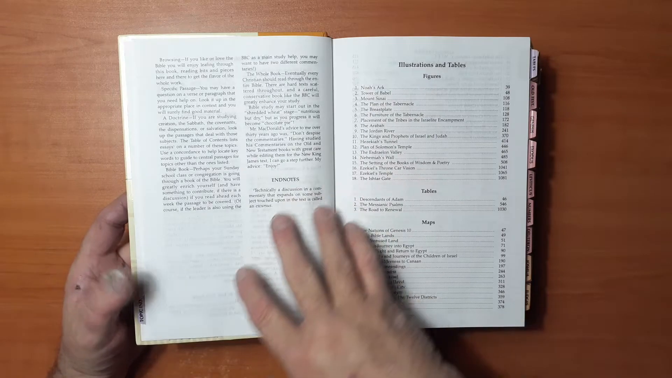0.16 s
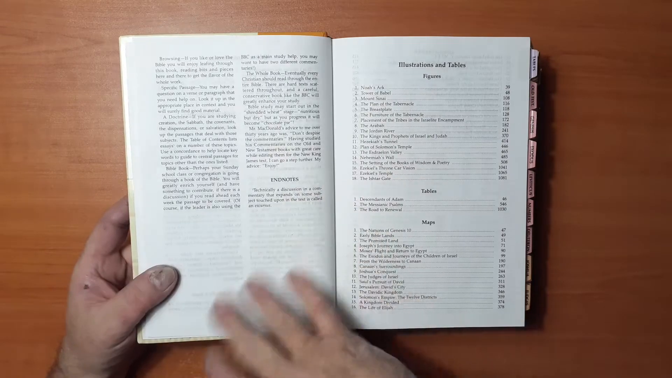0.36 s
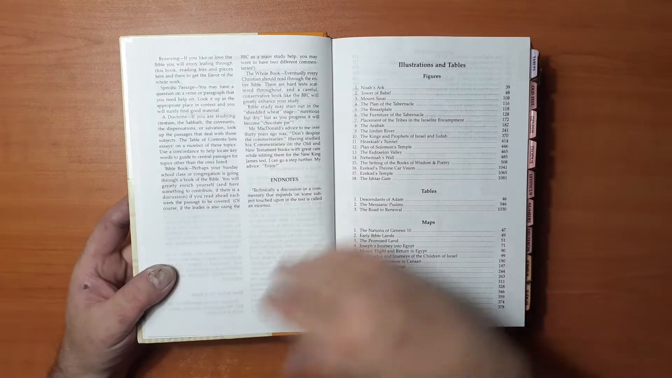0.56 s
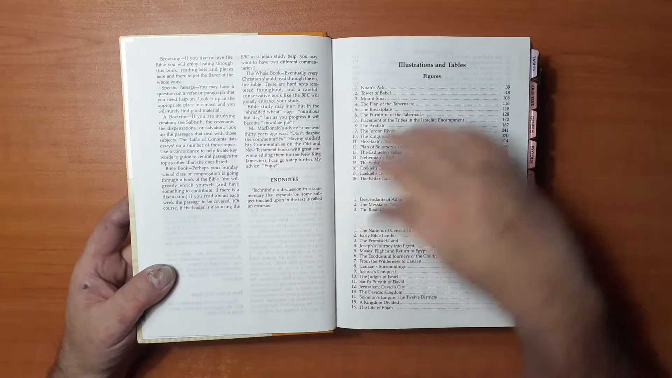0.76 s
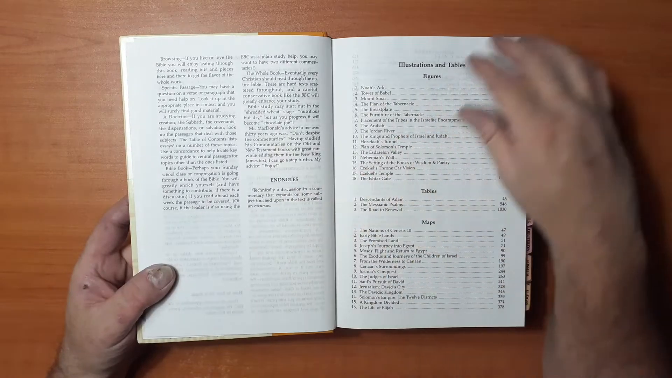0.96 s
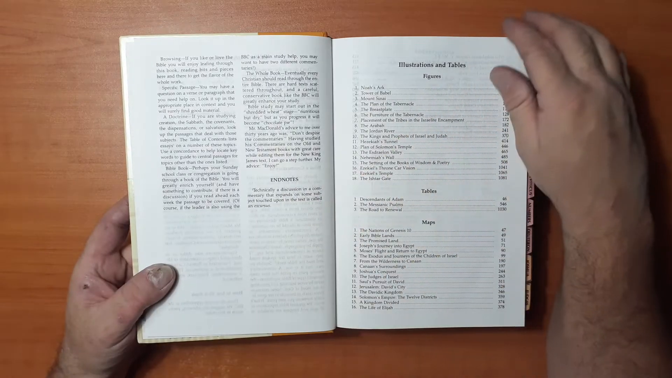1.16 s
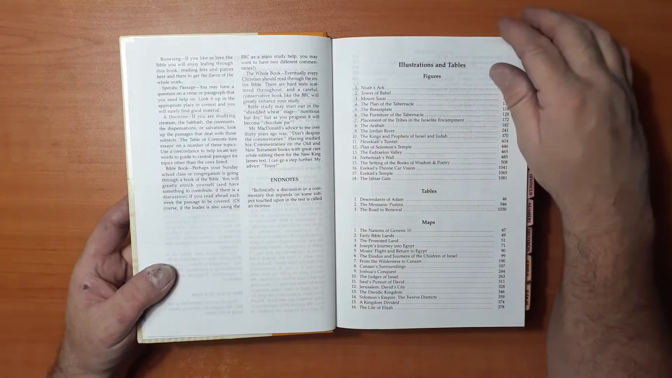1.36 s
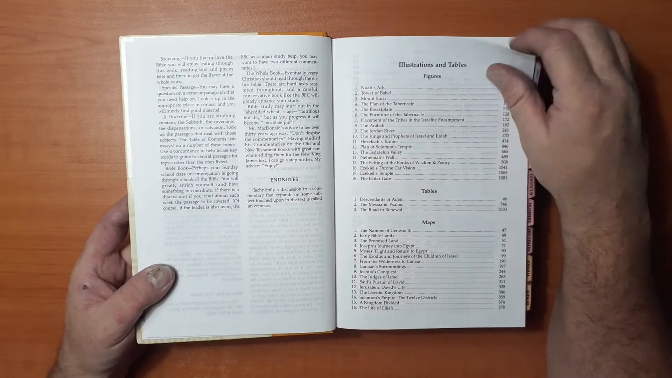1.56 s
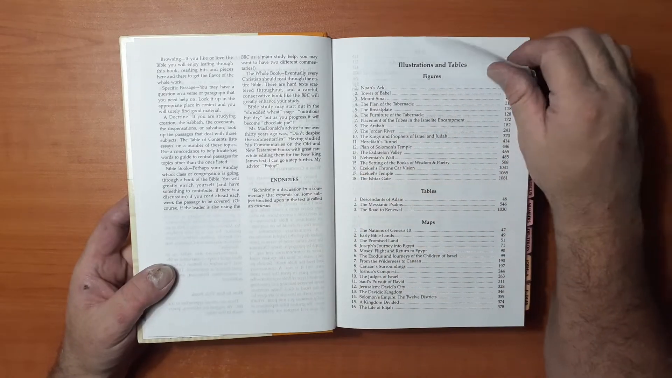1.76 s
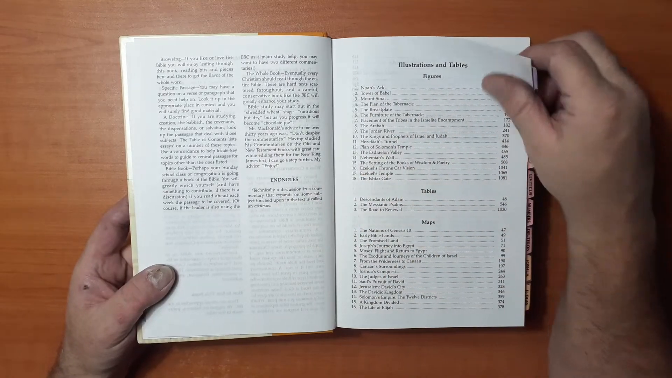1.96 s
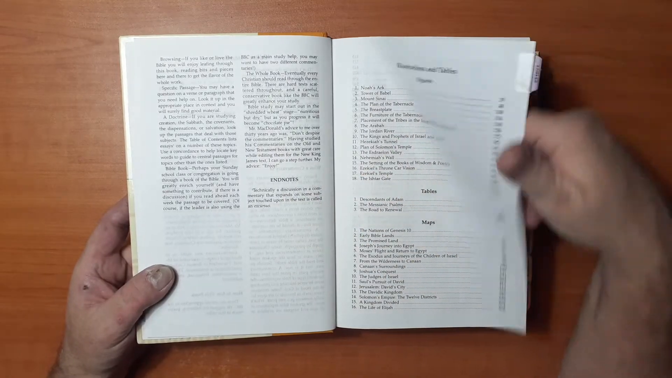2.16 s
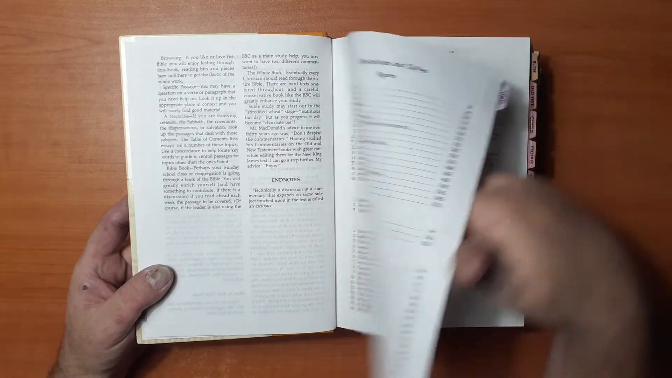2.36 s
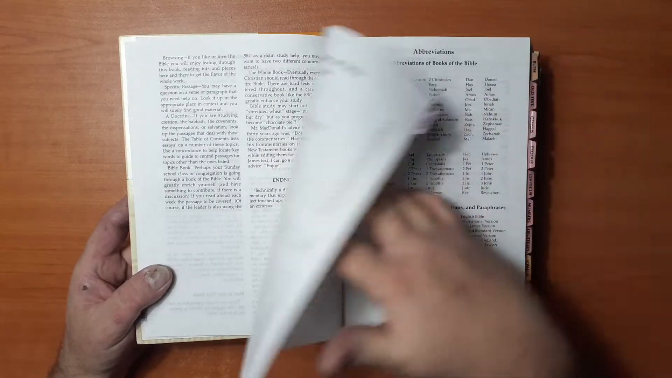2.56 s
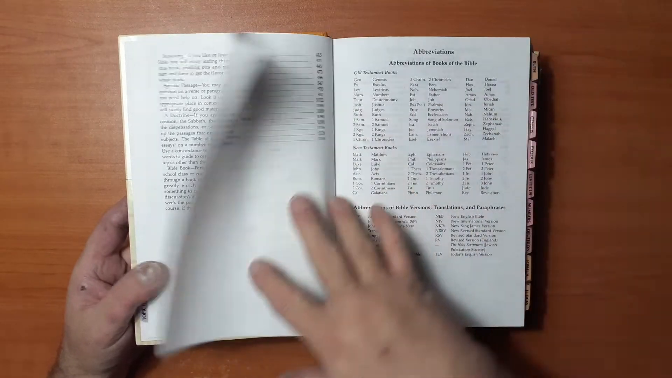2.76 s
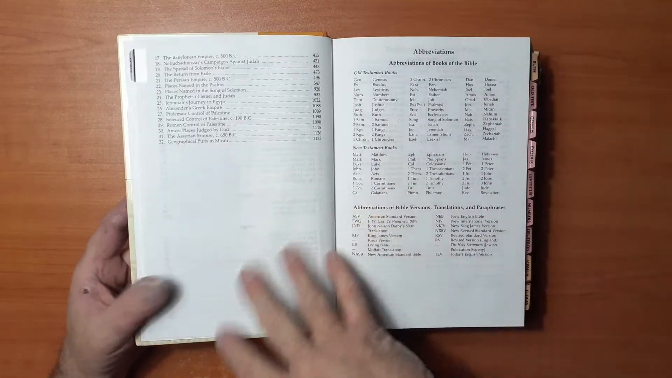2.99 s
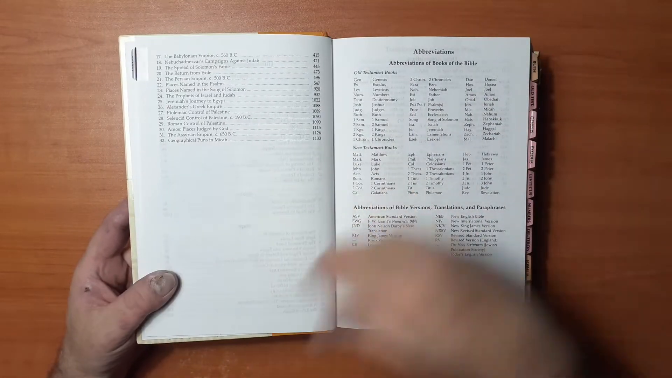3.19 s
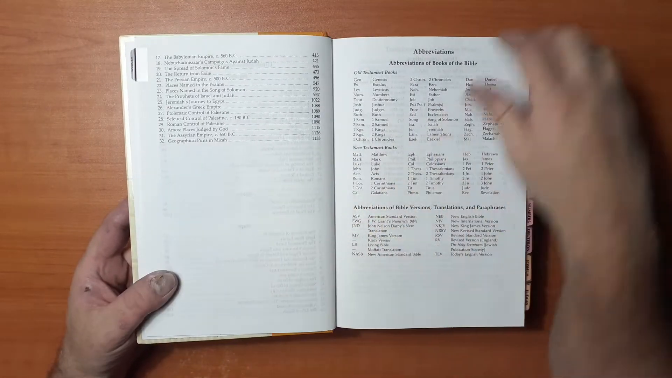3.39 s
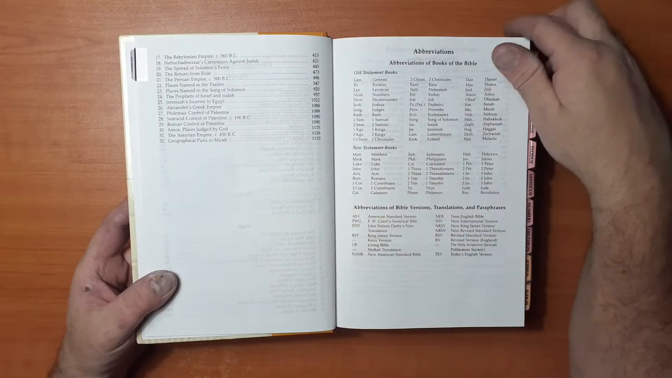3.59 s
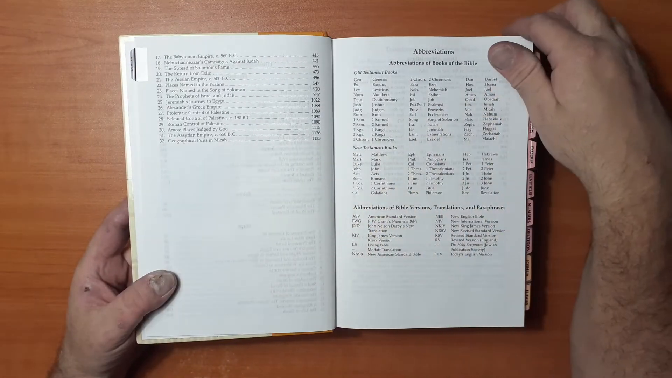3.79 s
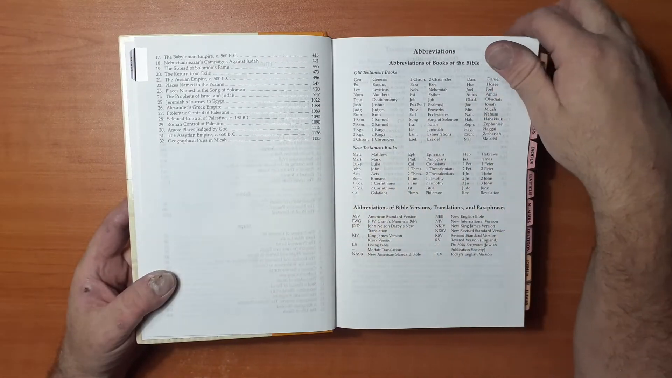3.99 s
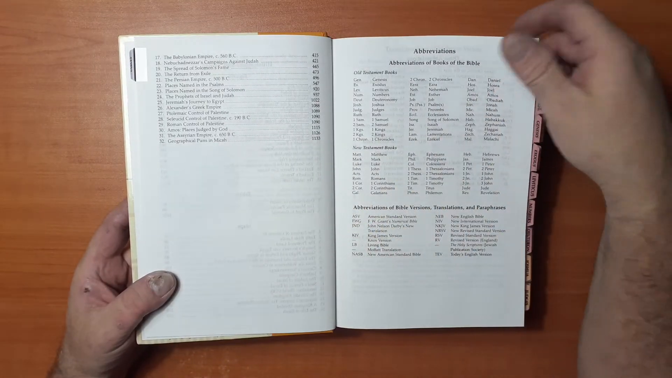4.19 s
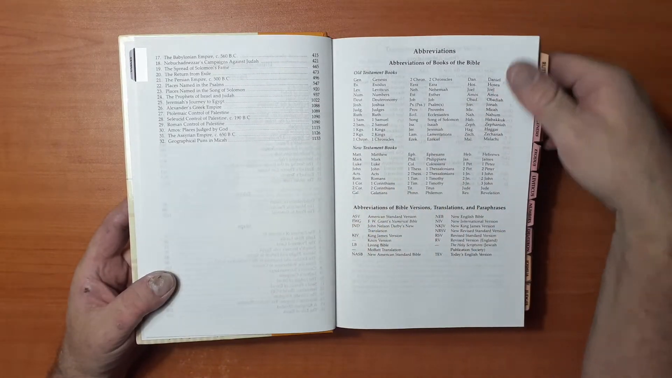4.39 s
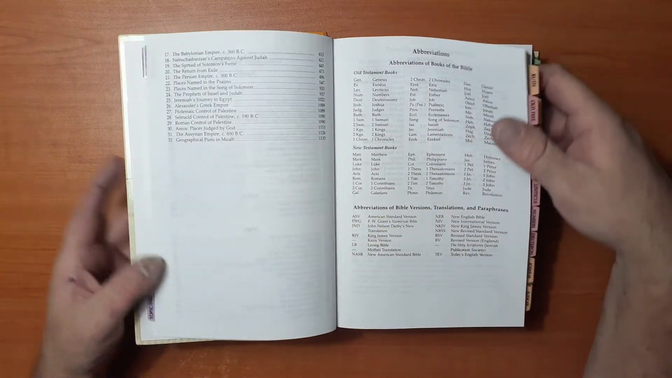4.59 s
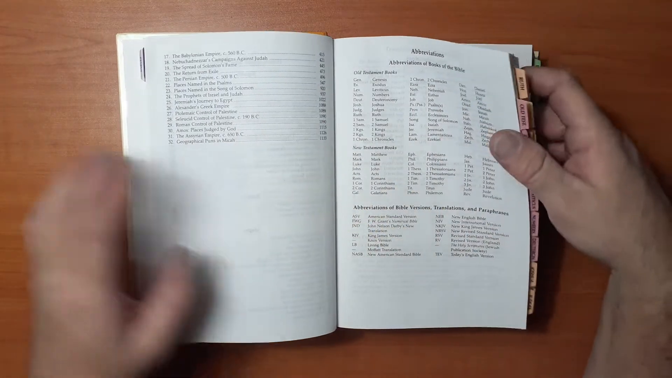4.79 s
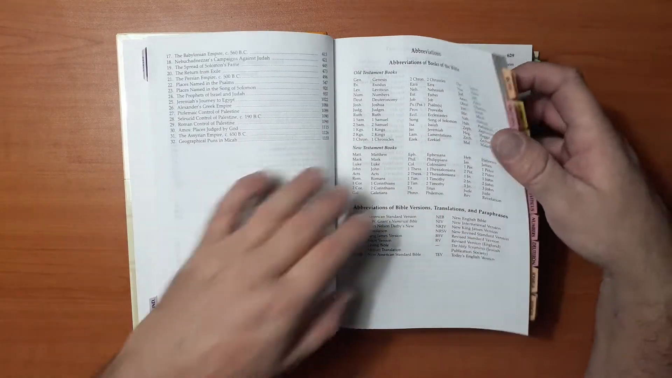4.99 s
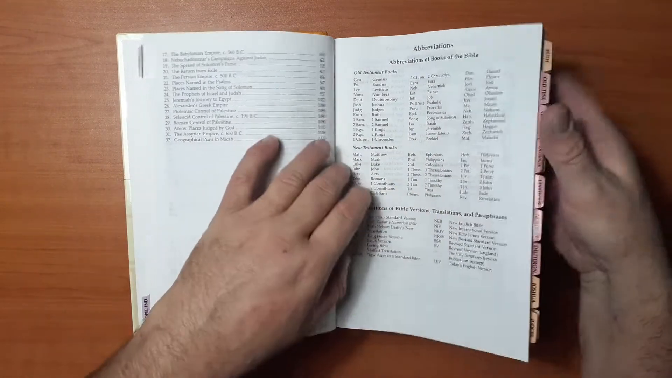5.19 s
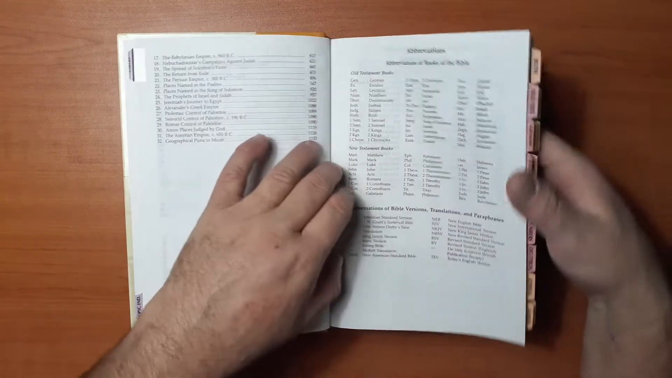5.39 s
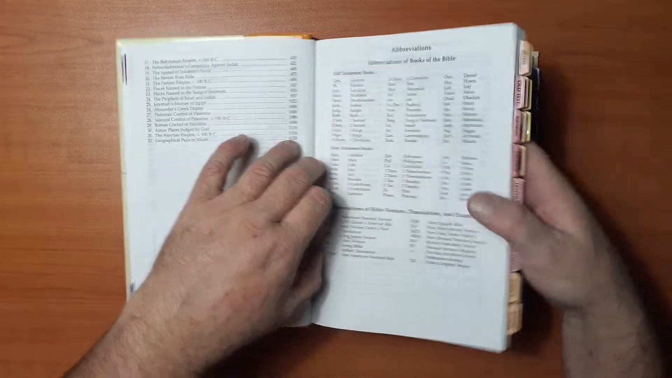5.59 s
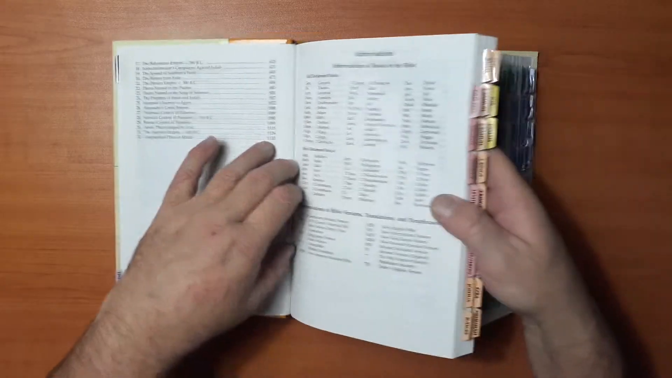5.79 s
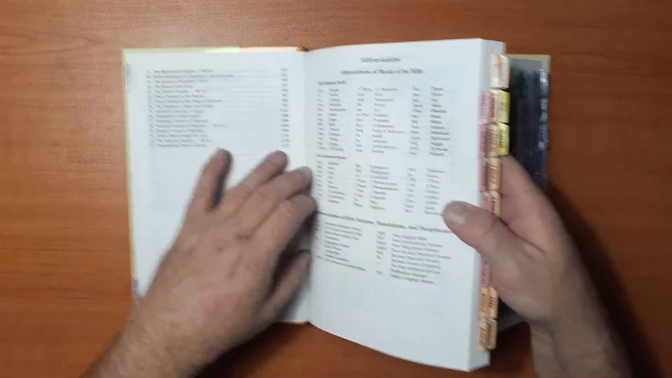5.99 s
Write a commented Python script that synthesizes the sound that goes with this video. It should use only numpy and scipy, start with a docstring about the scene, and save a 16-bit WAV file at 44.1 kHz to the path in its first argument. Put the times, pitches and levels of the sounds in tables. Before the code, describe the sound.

Close, quiet page leafing over a faint low fan hum; dry rustling, a few small ticks, a dragging scuff and a sharp thump on the table.

```python
"""Hands leaf through a thick book on a wooden table in a small quiet room, heard by two spaced microphones.
Sliding, flexing and dry skin are friction: grainy coloured noise, shaped stroke by stroke.
A low background, a fan with low handling rustle, is noise lifted at room resonances.
Scrapes of pages and of the dragging book are resonant noise bursts; sharp contacts are decaying sines
with a dull crack. Both ring the table's modes and are answered by a diffuse room tail."""
import sys
import numpy as np
from scipy import signal
from scipy.fft import rfft, irfft, next_fast_len
from scipy.io import wavfile
from scipy.ndimage import uniform_filter1d, map_coordinates

SR = 44100
rng = np.random.default_rng(int(sys.argv[2]) if len(sys.argv) > 2 else 0)


def gain_from_decibels(decibels):
    """Convert decibel values to linear amplitude factors."""
    exponent = np.asarray(decibels, float) / 20
    return 10 ** exponent


def int16_out(signal):
    """Quantize to a 16-bit WAV file."""
    q = np.round(np.clip(np.atleast_2d(signal).T, -1, 1) * 32767)
    wavfile.write(sys.argv[1], SR, q.astype(np.int16))


N = 266805  # length in samples


def unit(x):
    """Energy normalisation: scale to rms 1."""
    return x / np.sqrt(np.mean(x ** 2) + 1e-20)


def along(points, hz):
    """Spectral envelope: interpolate (frequency, value) points on a logarithmic frequency axis."""
    f, v = np.transpose(points)
    return np.interp(np.log(hz + 1), np.log(f + 1), v)


def curves(rows):
    """Piecewise-linear control: one value per sample for each column after the time."""
    s, *cols = np.transpose(rows)
    return [np.interp(np.arange(N) / SR, s, c) for c in cols]


def wobble(rate_hz):
    """Band-limited random modulation: a smooth curve through rate_hz random knots a second."""
    knots = rng.standard_normal(int(N * rate_hz / SR) + 4)
    return map_coordinates(knots, [np.arange(N) * rate_hz / SR])


def filtered(x, response):
    """Linear filtering: multiply the spectrum of x by a complex response of frequency."""
    m = next_fast_len(x.shape[-1] + 8192)
    return irfft(rfft(x, m) * response(np.fft.rfftfreq(m, 1 / SR)), m)[..., :x.shape[-1]]


def pair(x, lag_ms, pan_db):
    """Time and level differences: the left microphone hears x later by lag_ms and louder by pan_db."""
    n = np.arange(len(x))
    left = map_coordinates(x, [n - lag_ms * SR / 1000], mode="nearest")
    return np.array([left * gain_from_decibels(pan_db / 2), x * gain_from_decibels(-pan_db / 2)])


# strokes of hand and page: full_strength_from_s, held_s, slide_db, flex_db, skin_db
STROKE_EVENTS = [(0, 0.0101, -57, -51.5, -56.5), (0.064, 0.0132, -57, -55.5, -50.5),
                 (0.131, 0.173, -61.5, -63.5, -46.5), (.32, 0.0624, -58, -59, -48.5),
                 (.41, 0.206, -67, -70, -58.5), (0.579, 0.1188, -63.5, -63.5, -53.5),
                 (.76, 0.27, -60.5, -74, -53), (1.04, 0.071, -68, -86, -69.5),
                 (1.14, 0.057, -76.5, -91.5, -73), (1.522, 0.056, -59, -70.5, -64),
                 (1.64, 0.066, -69, -82, -85), (1.9, 0.0116, -59.5, -69.5, -73),
                 (2.04, 0.084, -65, -77.5, -80), (2.125, 0.043, -55, -54.5, -49.5),
                 (2.21, 0.0427, -62, -58, -61), (2.299, .09, -58.5, -59, -67.5),
                 (2.42, 0.0338, -56.5, -56, -58.5), (2.575, 0.116, -65, -62, -67.5),
                 (2.755, 0.121, -52, -52, -48.5), (2.9, 0.1518, -58.5, -57, -49),
                 (3.45, 0.0193, -74.5, -91.5, -71), (4.009, 0.0102, -66.5, -95.5, -67),
                 (4.137, 0.0197, -63, -64.5, -80.5), (4.21, 0.103, -69, -67, -79),
                 (4.319, 0.0715, -64, -64.5, -65.5), (4.48, 0.063, -67, -69.5, -71),
                 (4.571, .06, -59.5, -57, -58.5), (4.72, 0.046, -61, -58.5, -71),
                 (4.82, .27, -66, -54.5, -90), (5.11, 0.0436, -60, -56, -67.5),
                 (5.29, 0.056, -65, -59, -65), (5.4, 0.041, -60, -58.5, -58),
                 (5.539, 0.0087, -68.5, -63, -66), (5.707, 0.0384, -63.5, -57.5, -60.5),
                 (5.799, 0.0184, -56, -45, -54), (5.95, 0.032, -64, -59.5, -64.5),
                 (6.01, 0.049, -64, -56, -60)]


def strokes():
    """Exponential envelopes: each stroke swells, holds and fades; uncorrelated strokes add in power."""
    swell_db_per_s, fade_db_per_s = 463, 193
    t, power = np.arange(N) / SR, np.zeros((3, N))
    for s, held, *levels_db in STROKE_EVENTS:
        swell_db = swell_db_per_s * (t - s)
        fade_db = fade_db_per_s * (s + held - t)
        shape_db = np.minimum(0, np.minimum(swell_db, fade_db))
        power += np.outer(gain_from_decibels(levels_db), gain_from_decibels(shape_db)) ** 2
    return np.sqrt(power)


def friction(colour, grain_db, patchy_db):
    """Stick-slip of fibres: heavy-tailed noise grains in patches of random gain, three unrelated strands."""
    grain = 24  # samples
    catch = np.minimum(rng.exponential(size=(3, N // grain + 1)), 3.5)
    grain_gain = gain_from_decibels(grain_db * np.repeat(catch, grain, axis=1)[:, :N])
    z = signal.stft(rng.standard_normal((3, N)) * grain_gain, nperseg=512)[2]
    # patches span several frequency bins and frames
    field = uniform_filter1d(rng.standard_normal(z.shape[1:]), 7, 0)
    field = uniform_filter1d(field, 6, 1)
    patchy = signal.istft(z * gain_from_decibels(patchy_db * unit(field)), nperseg=512)[1][:, :N]
    return unit(filtered(patchy, lambda hz: gain_from_decibels(along(colour, hz))))


# smoothed left lag and balance used for rustle and scuffs: time_s, left_lag_ms, left_over_right_db
LAG_AND_BALANCE = [(0, -0.192, 3.5), (.75, 0.022, 4), (1.05, 0.434, 2.5), (1.6, 0.382, 6.5),
                   (1.9, 0.101, 4), (2.8, -0.148, 2), (3.15, -0.157, 4.5), (3.5, 0.469, 6.5),
                   (4.5, 0.4494, 3), (4.65, 0.063, 1), (5.5, 0.163, 2.23), (6.05, 0.096, 3)]
# relative spectrum of fingers sliding on paper: frequency_hz, density_db (per hertz)
SLIDE_COLOUR = [(1500, -44), (3000, -12.5), (4500, -5.5), (6500, -1), (8200, -2.5), (11000, -13),
                (16000, -48)]
# relative spectrum of pages flexing: frequency_hz, density_db (per hertz)
FLEX_COLOUR = [(500, -37), (900, -12), (1400, -2.5), (2200, -2), (3200, -4.5), (4500, -7.5), (8000, -32)]
# relative spectrum of dry skin: frequency_hz, density_db (per hertz)
SKIN_COLOUR = [(5000, -38), (8000, -11), (9500, -4.5), (12000, -5), (14000, 0), (16000, -2)]


def rubbing():
    """Partial coherence: part of the rustle comes from one spot, part from all over the page."""
    slide, flex, skin = strokes()
    lag_ms, pan_db = curves(LAG_AND_BALANCE)
    # uneven grip shakes all three frictions together
    grip_db = 1.2 * wobble(22)
    strands = gain_from_decibels(grip_db) * (
        slide * friction(SLIDE_COLOUR, grain_db=2.5, patchy_db=1.5)
        + flex * friction(FLEX_COLOUR, grain_db=3, patchy_db=2.5)
        + skin * friction(SKIN_COLOUR, grain_db=1.5, patchy_db=3.5))
    spot_share = 0.45  # of the power
    spot = pair(strands[0], lag_ms, pan_db)
    spread = strands[1:] * gain_from_decibels([pan_db / 2, -pan_db / 2])
    return np.sqrt(spot_share) * spot + np.sqrt(1 - spot_share) * spread


# slow level of the low background, fan with low handling rustle,
# before flutter and channel balance: time_s, level_db
BACKGROUND_LEVEL = [(0, -56), (.9, -56), (1.25, -58.5), (2.87, -57), (4.2, -59.5), (5.6, -55.5)]
# relative background spectrum before the room's lift: frequency_hz, density_db (per hertz)
BACKGROUND_COLOUR = [(15, -52), (25, -25.5), (60, -10), (113, -5.5), (218, -2.5), (280, -5), (395, -6.5),
                     (592, -6.5), (763, -3.5), (900, -7), (1120, -10), (1500, -13.5), (2000, -29),
                     (3000, -38), (5200, -44), (8800, -100)]
# resonances of the room: frequency_hz, width_hz, lift_db
ROOM_MODES = [(79.4, 11, 3.5), (160.76, 15.1, 9.67), (117.5, 5.2, 1.06), (251.5, 5.3, 2.2),
              (483.3, 11.9, 11.53), (680.3, 33.8, 5.05)]


def fan_background():
    """Room modes: noise of fan and low rustle lifted at resonances; the direct part reaches the right first."""
    def colour(f):
        lift_db = sum(db / (1 + (2 * (f - hz) / width) ** 2) for hz, width, db in ROOM_MODES)
        return gain_from_decibels(along(BACKGROUND_COLOUR, f) + lift_db)

    def direct_share(f):  # of the power, larger in the bass
        return 0.67 + 0.325 / (1 + (f / 350) ** 2)

    direct, *walls = unit(filtered(rng.standard_normal((3, N)), colour))
    near = pair(filtered(direct, lambda f: np.sqrt(direct_share(f))), 0.4263, 0)
    far = filtered(np.array(walls), lambda f: np.sqrt(1 - direct_share(f)))
    flutter_db = 0.7 * wobble(5)
    balance = gain_from_decibels([[1.6], [-1.4]])  # left, right
    return gain_from_decibels(curves(BACKGROUND_LEVEL)[0] + flutter_db) * balance * (near + far)


# modes of the wooden top, levels before each blow's variation: frequency_hz, level_db, t60_s
TABLE_MODES = [(106.9, -14.5, 0.079), (390.9, -8.5, 0.0394), (477.84, 4.5, 0.0588), (541.1, -5, 0.1004),
               (574, -2, 0.109), (684.2, 0, 0.0383), (724, -18.5, .1), (810, 0.5, 0.0285),
               (950, -18, 0.285), (1041.5, -25, 0.186), (1185.4, 1, 0.0257)]


def table(t):
    """Modal synthesis: decaying sines of the wooden top; each blow finds the modes at new strengths."""
    luck_db = rng.normal(0, 2, len(TABLE_MODES))
    ring = np.zeros(len(t))
    for (hz, db, t60), luck in zip(TABLE_MODES, luck_db):
        ring += gain_from_decibels(db + luck - 60 * t / t60) * np.sin(2 * np.pi * hz * t)
    onset = 1 - np.exp(-t / 0.00258)
    # a second-order low cut at 80 Hz keeps deep bass out of the ring
    return filtered(onset * ring, lambda f: (1j * f / (1j * f + 80)) ** 2)


# decay of the room: frequency_hz, t60_s
ROOM_DECAY = [(150, 0.99), (500, 0.216), (2000, 0.3254), (6000, 0.148), (14000, 0.0733)]


def room(x, seconds=.4):
    """Diffuse reverberation: a new noise tail each call, each frequency dying at its own speed."""
    noise = rng.standard_normal((2, int(SR * seconds)))
    hz, t, z = signal.stft(noise, SR, nperseg=256)
    decay = gain_from_decibels(-60 * t / along(ROOM_DECAY, hz)[:, None])
    tail = signal.istft(z * decay, SR, nperseg=256)[1]
    # long waves reach both microphones alike
    tail[1] += 0.89 * filtered(tail[0] - tail[1], lambda f: 1 / (1 + (f / 500) ** 2))
    tail = tail / np.linalg.norm(tail[0])
    late = np.pad(x, (250, 0))[None]  # delay in samples before the tail
    return signal.fftconvolve(late, tail, axes=1)[:, :len(x)]


# scrapes of pages, and of the book dragging on the table:
# start_s, level_db, centre_hz, t60_s, table_db (relative to the level)
SCUFF_EVENTS = [(.101, -45, 1920, 0.236, -31), (1.489, -68.5, 6000, 0.05, -31),
                (1.733, -47, 6530, 0.0255, -26.5), (1.793, -48, 6680, 0.0497, -29.5),
                (1.851, -45, 6500, 0.0316, -31.5), (1.885, -51, 6400, 0.093, -28.5),
                (2.098, -54, 3000, .1, -22), (2.47, -41, 1380, 0.029, -34.5),
                (2.557, -53, 3520, 0.103, -14.5), (4.461, -59, 5080, .068, -17),
                (4.618, -36.5, 1736, 0.0309, -32.5), (4.768, -46, 1820, 0.051, -8),
                (4.86, -37.5, 2250, 0.035, -21.5), (5.129, -45.5, 1430, 0.141, -4),
                (5.22, -29, 1630, 0.0646, -4), (5.226, -36, 6930, 0.0985, -30.5),
                (5.345, -55.5, 800, 0.134, 7.5), (5.392, -37.5, 2430, 0.0448, -10),
                (5.55, -54.5, 820, 0.174, .5)]


def scuffs():
    """Damped resonance: scrapes are noise bursts around one broad resonance that also shake the table."""
    out, t = np.zeros((2, N + SR)), np.arange(SR // 2) / SR
    lag_ms, pan_db = curves(LAG_AND_BALANCE)
    rise, room_db = 0.076, -4.0  # rise time over t60; room level
    for s, db, hz, t60, table_db in SCUFF_EVENTS:
        def broad_resonance(f):
            resonance = 1j * f * hz / (hz * hz - f * f + 1j * f * hz * 0.74)
            return resonance / (1 + 1j * f / (2 * hz))

        swell = (1 - np.exp(-(t / (rise * t60)) ** 2)) * gain_from_decibels(-60 * t / t60)
        scrape = swell * unit(filtered(rng.standard_normal(len(t)), broad_resonance))
        push = swell * rng.standard_normal(len(t))
        shake = signal.fftconvolve(push, table(t))[:len(t)]
        burst = gain_from_decibels(db) * (scrape + gain_from_decibels(table_db) * shake / np.abs(shake).max())
        i = round(s * SR)
        out[:, i:i + len(t)] += pair(burst, lag_ms[i], pan_db[i]) + gain_from_decibels(room_db) * room(burst)
    return out[:, :N]


# sharp contacts: start_s, level_db (common gain), pitch_hz, t60_s, table_db, crack_db (both inside that gain)
TAP_EVENTS = [(.4765, -39.5, 605, 0.0236, -18, -12.5), (.479, -39, 206.8, 0.0403, -27.5, -28.5),
              (0.6386, -32, 1716, 0.0137, -8.5, -11.5), (2.7086, -39, 1579, 0.014, -40.5, 3.5),
              (2.9448, -21.5, 4750, 0.0042, -39, -2.5), (5.607, -39.5, 786, 0.0119, -6, -28),
              (5.6921, -21.5, 633.8, 0.0406, -1.5, -2), (5.7731, -11, 694, 0.0065, -26.5, -13),
              (5.7749, -7, 666.4, 0.0433, -16.5, -9), (5.8133, -20.5, 958, 0.007, -22, -4.5)]


def taps():
    """Impact excitation: a short ping with a dull crack rings the table, and the room answers."""
    out, t = np.zeros((2, N + SR)), np.arange(SR // 2) / SR
    lag_ms, pan_db, room_db = -0.1066, 5, -6
    for s, db, hz, t60, table_db, crack_db in TAP_EVENTS:
        def small(f):  # a small source radiates little below its pitch
            return (1j * f / (1j * f + 0.6165 * hz)) ** 5

        onset = 1 - np.exp(-(t * hz * 1.5) ** 2)
        ping = onset * gain_from_decibels(-60 * t / t60) * np.sin(2 * np.pi * hz * t)
        rattle = onset * gain_from_decibels(-60 * t / 0.02282) * rng.standard_normal(len(t))
        crack = filtered(rattle, lambda f: 3 / (1 + 1j * f / (2400 + 0.2 * hz)) ** 3)
        direct = filtered(ping + gain_from_decibels(crack_db) * crack, small)
        hit = gain_from_decibels(db) * (3 * direct + gain_from_decibels(table_db) * table(t))
        # treble beams up at the microphones and feeds the room less
        to_room = filtered(hit, lambda f: 1 / (1 + 1j * f / 3000))
        i = round(s * SR)
        out[:, i:i + len(t)] += pair(hit, lag_ms, pan_db) + gain_from_decibels(room_db) * room(to_room)
    return out[:, :N]


def scene():
    """Superposition: the sum of everything in front of the microphones."""
    return rubbing() + fan_background() + scuffs() + taps()


# microphone response: frequency_hz, gain_db
MIC_RESPONSE = [(4500, 0.5), (6600, 2.5), (7500, -3), (8400, -8.5), (10000, -4.5), (12000, 2), (16000, -9)]


def microphones(dry):
    """Transducer response: the microphones colour the treble."""
    return filtered(dry, lambda hz: gain_from_decibels(along(MIC_RESPONSE, hz)))


# relative spectrum of microphone hiss: frequency_hz, density_db (per hertz)
HISS_COLOUR = [(1500, -23), (2500, -7), (3200, 0), (5000, -5), (6500, -3), (8200, -9.5), (10000, -6),
               (13000, 1), (16000, -8)]


def mic_hiss():
    """Self-noise: independent coloured noise in each microphone, stronger in the left."""
    noise = rng.standard_normal((2, N))
    hiss = unit(filtered(noise, lambda hz: gain_from_decibels(along(HISS_COLOUR, hz))))
    return gain_from_decibels([[-83 + 1.2], [-83 - 1.2]]) * hiss  # dB, left and right


def low_pass(x):
    """Removes everything above the highest recorded frequency."""
    return signal.sosfilt(signal.butter(12, 16340, fs=SR, output="sos"), x)


def record(dry):
    """Signal chain: the microphones' response to the scene, plus their own hiss."""
    mix = microphones(dry) + mic_hiss()
    return low_pass(mix)


dry = scene()
out = record(dry)
int16_out(out)
```